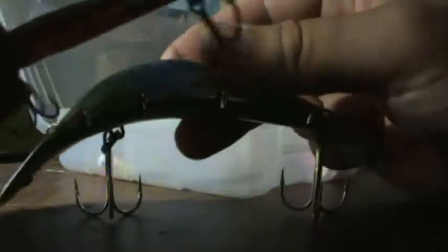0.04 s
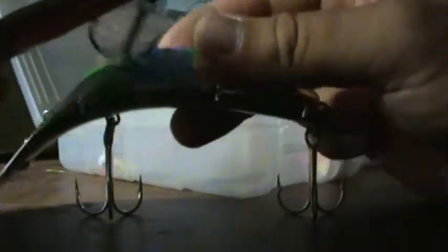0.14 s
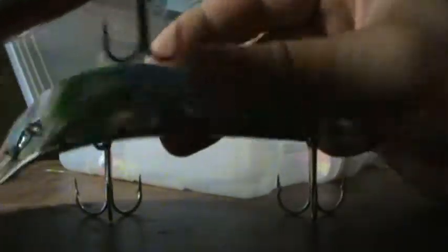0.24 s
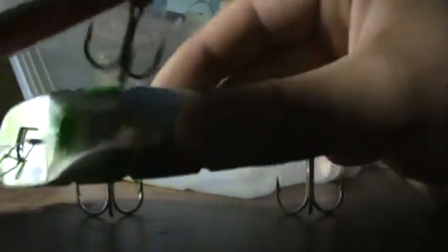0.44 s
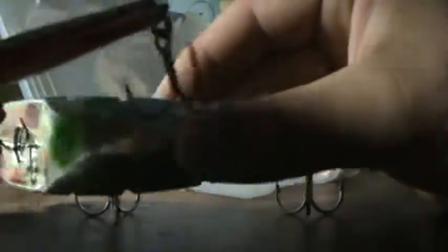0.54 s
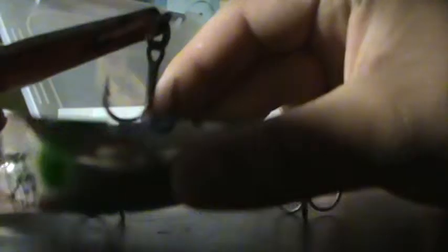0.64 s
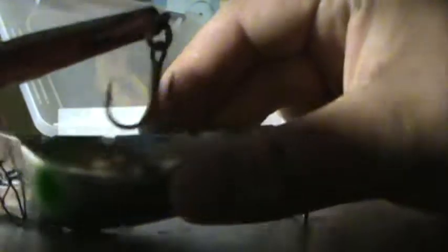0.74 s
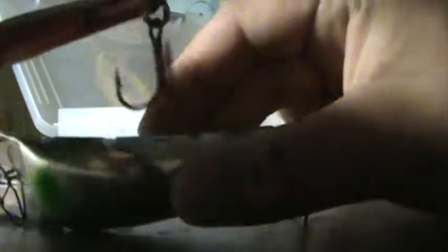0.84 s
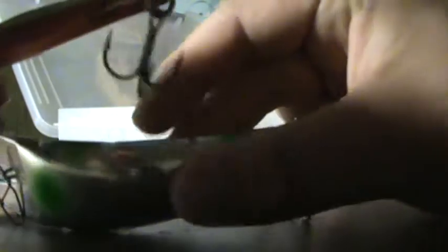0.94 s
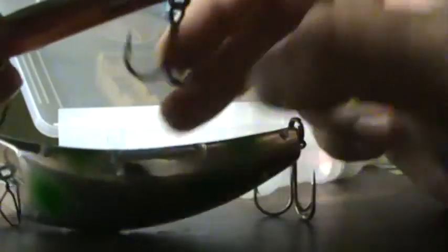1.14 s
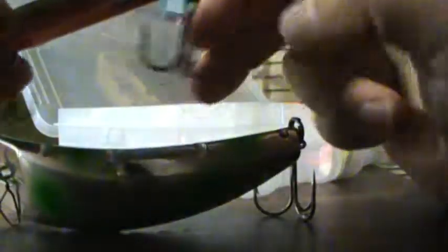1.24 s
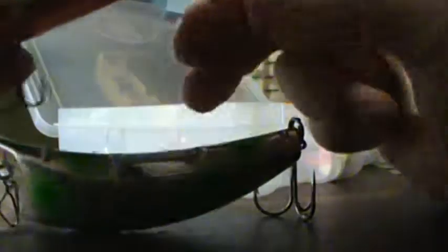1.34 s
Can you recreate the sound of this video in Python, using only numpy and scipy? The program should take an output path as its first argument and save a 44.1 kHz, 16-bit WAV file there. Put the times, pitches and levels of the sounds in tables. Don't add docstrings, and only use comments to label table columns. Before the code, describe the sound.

Metal treble hooks jingle on a handled fishing lure, then it thuds down on a wooden table

```python
import sys
import numpy as np
from scipy import signal
from scipy.fft import rfft, irfft
from scipy.io import wavfile
from scipy.ndimage import uniform_filter1d

SR = 44100
rng = np.random.default_rng(int(sys.argv[2]) if len(sys.argv) > 2 else 0)


def decibels_to_gain(level_db):
    exponent = np.asarray(level_db, float) / 20
    return 10 ** exponent


def dump(signal):
    limited = np.clip(np.atleast_2d(signal).T, -1, 1)
    pcm = np.round(limited * 32767).astype(np.int16)
    wavfile.write(sys.argv[1], SR, pcm)


N = 61739


def read(points, hz):
    f, value = np.transpose(points)
    return np.interp(np.log(hz + 1), np.log(f + 1), value)


def evened(x):
    return x / np.sqrt(np.mean(x ** 2) + 1e-20)


def add(mix, s, sound):
    part = mix[round(s * SR):][:len(sound)]
    part += sound[:len(part)]


def filtered(x, order, hz, kind):
    return signal.sosfilt(signal.butter(order, hz, kind, fs=SR, output="sos"), x)


def camera_hiss():
    # pitch_hz, level_db [dB per Hz]
    hiss_curve = [(15, -39), (25, 12.5), (344, -11.5), (405, -8), (451, -6.5), (1700, -4), (1890, -6),
                  (2690, -7), (16000, -16.5)]
    # pitch_hz, likeness [-1 to 1]
    likeness = [(30, 0.27), (300, 0.2), (2000, 0.06), (16000, 0.86)]
    hz = np.fft.rfftfreq(N, 1 / SR)
    left, other = rfft(rng.standard_normal((2, N)))
    same = np.clip(read(likeness, hz), -1, 1)
    right = same * left + np.sqrt(1 - same ** 2) * other
    hiss = irfft(np.array([left, right]) * decibels_to_gain(read(hiss_curve, hz)), N)
    return decibels_to_gain(-57.7) * evened(hiss)


def camera_motor():
    pitch_hz, ticks_per_s, level_db, t60_s = 2050, 30.3, -59, .05
    t, ticks = np.arange(3000) / SR, np.zeros(N)
    times = np.arange(.011, N / SR, 1 / ticks_per_s)
    for s, draw in zip(times, rng.standard_normal((60, 2))):
        fade = decibels_to_gain(level_db + 0.61 * draw[0] - 60 * t / t60_s)
        add(ticks, s, fade * np.sin(2 * np.pi * pitch_hz * (1 + 0.034 * draw[1]) * t))
    return ticks * decibels_to_gain(np.array([[.1], [-.1]]))


def wood_modes():
    # pitch_hz, level_db, t60_s
    wood = [(79.7, -3.5, 0.21), (174, -6, 0.13), (249, 0.5, 0.034), (298.4, -10.5, 0.052), (405, -6, 0.031),
            (508, -3.5, 0.017), (623.2, -15.5, 0.21), (728, -10, 0.17), (940, -19.5, 0.1),
            (1229, -5, 0.025), (1633, -5, 0.085), (1965, 3.5, 0.049)]
    hz, level, t60 = np.transpose(wood)[:, :, None]
    return hz, level, np.minimum(t60, 80 / hz)


def rubbing():
    # time_s, level_db
    pressure = [(0, -69.5), (.15, -62), (.3, -60), (.55, -51), (0.612, -60.5), (0.65, -46), (.69, -36.5),
                (.706, -50), (0.739, -31.5), (0.819, -52.5), (0.979, -69), (1.148, -64.5), (1.249, -82.5),
                (1.4, -63)]
    t = np.arange(SR // 3) / SR
    hz, level, t60 = wood_modes()
    lump_db = 2 * evened(uniform_filter1d(rng.standard_normal(N), 500))
    friction = rng.standard_normal(N) * decibels_to_gain(lump_db)
    fade = decibels_to_gain(level - 9.8 * abs(np.log2(hz / 230)) - 90 * t / t60)
    body = (fade * np.sin(2 * np.pi * hz * t)).sum(0)
    rub = signal.fftconvolve(friction, body)[:N]
    return evened(rub) * decibels_to_gain(np.interp(np.arange(N) / SR, *np.transpose(pressure)) + 6.5)


def clink(db, bright_hz, low, draw, contact_s=.0008):
    # pitch_hz, width_hz, level_db
    hook_modes = [(2680, 56, 2), (3116, 296, 9), (4680, 92, 3.5), (5300, 430, 11), (6350, 275, 9.5),
                  (7610, 590, 15.5), (8327, 323, 11), (9480, 402, 11), (10100, 400, 9.5),
                  (11000, 350, 10.5), (12100, 640, 14.5), (13610, 330, 7.5), (15200, 580, -6)]
    favour_db, favour_oct, scatter_db, far_db = 10, .12, 4, -1.8
    widen, damped_hz, rise_s, first_blow = 1.3, 200, .00025, 4
    t = np.arange(2400) / SR
    hz, width, level = np.transpose(hook_modes)
    level_draw, pitch_draw, grit_draw = draw[:len(hz)], draw[14:14 + len(hz)], draw[28:]

    octaves = np.log2(hz / bright_hz)
    free = np.exp(-(octaves / favour_oct) ** 2)
    level = level + scatter_db * level_draw + favour_db * free + far_db * octaves ** 2
    level = level + .25 * db * (hz > 12500)
    gain = decibels_to_gain(level) * np.where(hz < 6000, 2 * np.clip(low, 0, 2), 1)

    pitch = hz * (1 + 0.0035 * pitch_draw * width / 100)
    loss = widen * width + damped_hz * (1 - free)
    modes = np.exp(-np.pi * loss[:, None] * t) * np.sin(2 * np.pi * pitch[:, None] * t)
    ring = (1 - np.exp(-t / rise_s)) ** 2 * (gain @ modes)

    contact = np.exp(-t[1:len(grit_draw) + 1] / contact_s)
    grit = grit_draw * abs(grit_draw) * contact
    grit[0] += first_blow
    out = np.convolve(ring, grit)
    return decibels_to_gain(db) * out / abs(out).max()


def hooks():
    # start_s, peak_db, brightest_hz, low_ring_share
    hand_jingle = [(0.0313, -46.5, 2750, 0.8), (0.0608, -28, 8040, 0.3), (0.0672, -25.5, 2740, 1.2),
                   (0.0705, -20.5, 8980, 0.47), (0.074, -23, 2730, 0.1), (.0785, -38, 8850, 0.1),
                   (0.0954, -26.5, 6400, 0.5), (0.0998, -15.5, 10900, 0.9), (0.1138, -15.5, 10600, 1),
                   (0.1177, -15, 9450, 0.3), (0.13, -29, 9500, .3), (0.1372, -27, 10400, 0.7),
                   (0.1487, -27, 8350, 0.5), (0.154, -24.5, 9100, 0.8), (0.1645, -37, 9300, 0.7),
                   (.1745, -32, 9350, 0), (.177, -27, 7500, .3), (0.1825, -30, 9200, 0),
                   (.1952, -29, 9350, .1), (0.2058, -22, 9350, 0.4), (0.2172, -17, 8550, 0.1),
                   (.2188, -8.5, 6300, 0.47), (0.225, -10.5, 8800, 0.2), (.227, -17, 10100, .1),
                   (.2355, -26, 6400, 0.4), (0.2468, -17, 8850, 0.2), (.2495, -15.5, 11900, 0),
                   (0.2708, -18.5, 8800, 1), (0.2843, -19, 10200, 0.5), (0.2875, -30, 2680, 0.4),
                   (0.3035, -13.5, 9600, 0.3), (0.321, -22.5, 4680, 0.3), (.3255, -24, 2100, 0.6),
                   (0.335, -3, 11000, 0), (.3355, -13, 6350, .5), (0.3388, -19, 9800, .2),
                     (0.341, -12, 9700, .2), (0.3504, -21, 9750, 0.1), (0.354, -21, 10400, .1),
                     (0.3573, -22, 11000, .1), (0.3642, -15, 9200, 0.1), (0.3738, -20, 4680, 0.8),
                     (0.374, -11.5, 12100, .1), (0.39, -6.5, 11000, 0.1), (0.3895, -26.5, 2680, .5),
                     (0.412, -24, 11000, .1), (0.401, -19, 11900, 0.05), (0.4816, -29, 8400, 0),
                     (0.4861, -11.5, 10460, 0.43), (0.495, -25, 9420, 0), (0.502, -19.5, 9800, 0.5),
                     (0.5138, -52, 8400, 0.8), (0.5172, -15, 8860, 0.3), (0.5212, -18.5, 9430, 0.3),
                     (0.5259, -16.5, 9550, 0.53), (.534, -32, 9400, 0.26), (0.5399, -16, 9400, 0.8),
                     (0.5435, -10, 10060, 0.52), (0.5458, -19.5, 10100, 1), (0.552, -23, 8400, 0.3),
                     (0.557, -31, 9350, 0.13), (0.559, -24, 9350, 0), (0.5661, -20, 7900, 0.62),
                     (0.577, -20.5, 8300, 0.9), (0.581, -28, 9350, .1), (0.593, -32, 9600, 0),
                     (0.6013, -12, 10100, 1), (0.6039, -23, 10400, 1), (0.677, -30.5, 3280, .5),
                     (0.688, -18, 4680, 0.08)]
    # start_s, peak_db, brightest_hz, low_ring_share [0-1]
    landing = [(0.7277, -21, 8500, 0.2), (0.7462, -4, 11600, 1), (.7495, -13.5, 9700, 0.9),
               (0.753, -7.5, 8700, 0), (0.7558, -5.5, 2920, 0.4), (.7605, -21, 11800, 0.5),
               (0.7625, -14, 6160, 0.6), (.7675, -28, 11500, 0.1), (.771, -20, 12100, 0.4),
               (0.7742, -13.5, 11570, 0.8), (.7765, -18, 6400, 0.5), (.7805, -29, 12100, 0.5),
               (.7845, -23, 6400, 0.2), (0.9927, -35, 9800, 0.5), (1.0805, -36, 2620, 0.08),
               (1.0964, -30.5, 8800, 0.85), (1.066, -43, 7300, 0.57), (1.125, -35, 2680, 0.6),
               (1.136, -35.5, 2680, 0.65), (1.108, -39, 2660, 1), (1.1177, -18, 5950, 0.68),
               (1.1637, -38, 4730, 0.23), (1.2077, -36.5, 7960, 0.03)]
    clinks, out = hand_jingle + landing, np.zeros(N)
    for (s, db, hz, low), draw in zip(clinks, rng.standard_normal((len(clinks), 200))):
        add(out, s, clink(db, hz, low, draw))
    return out


def rattles():
    # start_s, length_s, slips_per_s, level_db, low_ring_share [0-1], brightest_hz
    drags = [(0.063, 0.49, 270, -37.5, 1, 9100), (0.221, 0.72, 308, -31.5, 0.06, 4680),
             (0.406, 0.094, 160, -29, 0.28, 10460), (0.471, 0.27, 250, -35, 1, 7870),
             (1.027, 0.07, 400, -49, 0.57, 5300), (.726, 0.055, 420, -18.5, 1, 12100),
             (0.848, 0.044, 240, -35, 0.55, 9030), (0.91, 0.056, 290, -34, 0.78, 8930),
             (0.988, 0.018, 435, -35.5, 1, 10300), (1.072, 0.069, 207, -37.5, 0.33, 2890),
             (1.333, 0.028, 520, -53, 0.28, 4600)]
    slip_jitter, slip_unlikeness, fast_per_s = .1, .35, 500
    slips, fast_slips = np.zeros((2, N))
    for start, length, rate, db, low, bright_hz in drags:
        draws = rng.standard_normal((60, 202))
        draws[:, :28] *= slip_unlikeness
        times = np.cumsum(np.exp(slip_jitter * draws[:, 200])) / rate
        layer = fast_slips if rate > fast_per_s else slips
        for s, draw in zip(times[times < length], draws):
            swell = np.sin(np.pi * (s / length) ** .7) ** .6
            slip = clink(db + 2 * draw[201], bright_hz, low, draw[:200], contact_s=.00025)
            add(layer, start + s, swell * slip)
    return filtered(slips, 4, 11000, "low") + fast_slips


def thuds():
    # start_s, peak_db, knock_hz
    blows = [(0.2188, -30.5, 1910), (0.2207, -21.5, 193), (.321, -30, 2440), (.324, -28, 740),
             (0.37, -30.5, 1610), (.402, -26, 258), (0.505, -32, 260), (0.7161, -4, 320),
             (0.7272, -12.5, 197), (1.1175, -29, 1420), (1.03, -42, 600), (1.374, -40, 815)]
    t = np.arange(SR // 3) / SR
    hz, level, t60 = wood_modes()
    out = np.zeros(N)
    draws = rng.standard_normal((len(blows), 4, len(hz), 1))
    for (s, db, knock_hz), draw in zip(blows, draws):
        waves = np.sin(2 * np.pi * hz * t)
        for shift in draw[1:]:
            waves += np.clip(hz / 500, .25, 1) * np.sin(2 * np.pi * hz * (1 + 0.103 * shift) * t)
        mode_db = level + 1.5 * draw[0] - 3.47 * np.log2(hz / knock_hz) ** 2
        thud = -(decibels_to_gain(mode_db - 60 * t / t60) * waves).sum(0)
        attack = np.minimum(t * knock_hz / 0.39, 1)
        thud = np.convolve(thud * attack, np.hanning(9))
        add(out, s, decibels_to_gain(db) * thud / abs(thud).max())
    return out


def settling():
    start_s, level_db, t60_s = .722, -20.5, 0.28
    t = np.arange(N) / SR - start_s
    a, b = rng.standard_normal((2, N))
    rumble = evened(filtered([a + 0.58 * b, a - 0.42 * b], 2, [260, 787], "band"))
    return rumble * np.clip(t / 0.017, 0, 1) * decibels_to_gain(level_db - 60 * abs(t) / t60_s)


def room(x):
    # pitch_hz, t60_s
    room_decay = [(200, 0.086), (2000, 0.3), (14000, 0.14)]
    near_db, near_s, far_db = -13, 0.0123, -10
    length = SR // 2
    taps = np.zeros((2, length))
    at = np.arange(40, length - 20, 20)
    shape = (2, len(at))
    np.put_along_axis(taps, at + rng.integers(0, 20, shape), rng.choice([-1., 1.], shape), 1)
    near = taps * np.exp(-np.arange(length) / SR / near_s * 3)
    hz, t, z = signal.stft(taps, SR, nperseg=256)
    fade = decibels_to_gain(-60 * t / read(room_decay, hz)[:, None])
    far = signal.istft(z * fade, SR, nperseg=256)[1][:, :length]
    tail = decibels_to_gain(near_db) * near / np.linalg.norm(near[0]) + decibels_to_gain(far_db) * far / np.linalg.norm(far[0])
    return signal.fftconvolve(x[None], tail, axes=1)[:, :N]


def scene():
    metal = filtered(decibels_to_gain(-4.5) * hooks() + rattles(), 4, 2040, "high")
    wood = filtered(rubbing() + thuds(), 2, 100.5, "high")
    direct = metal * decibels_to_gain(np.array([[.95], [-.95]])) + wood * decibels_to_gain(np.array([[.7], [-.7]]))
    camera = camera_hiss() + camera_motor()
    return direct + room(metal + 1.236 * wood) + camera + settling()


def low_pass(x):
    return signal.sosfilt(signal.butter(12, 16790, fs=SR, output="sos"), x)


def record(dry):
    mix = signal.oaconvolve(dry, signal.firwin(255, 15900, fs=SR)[None], "same")
    return low_pass(mix)


dry = scene()
out = record(dry)
dump(out)
```